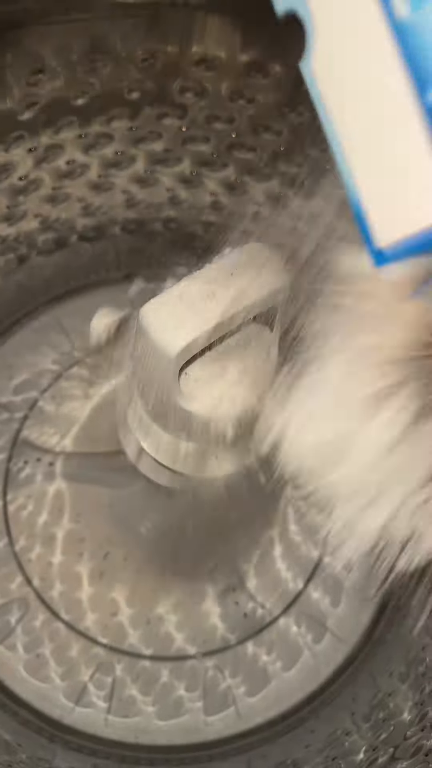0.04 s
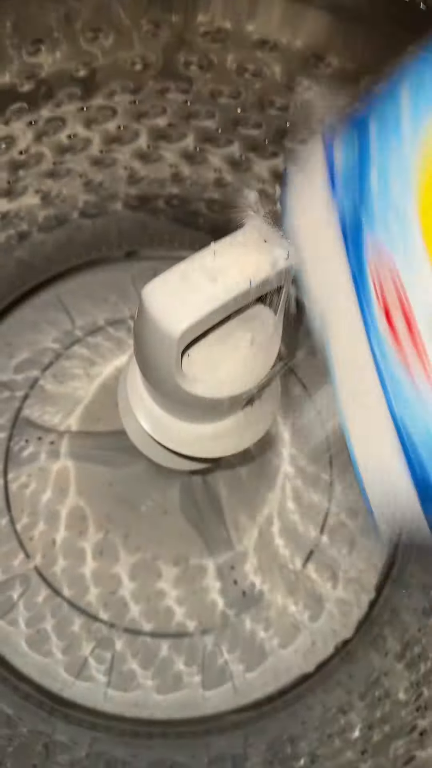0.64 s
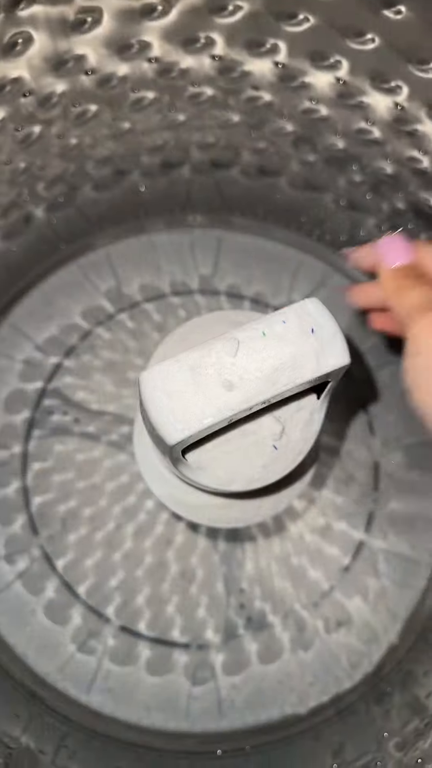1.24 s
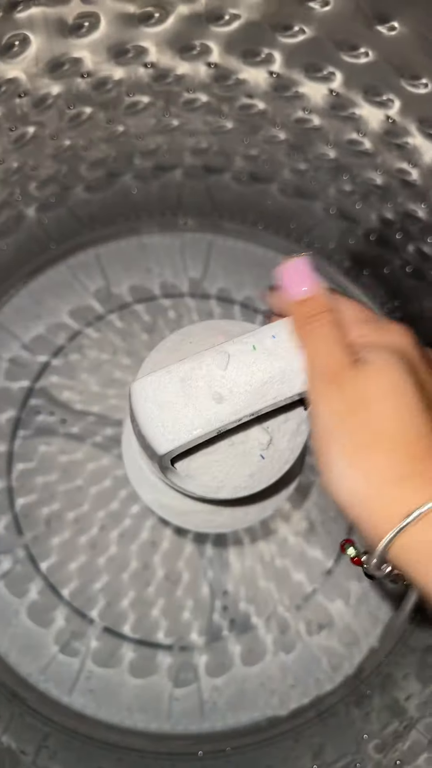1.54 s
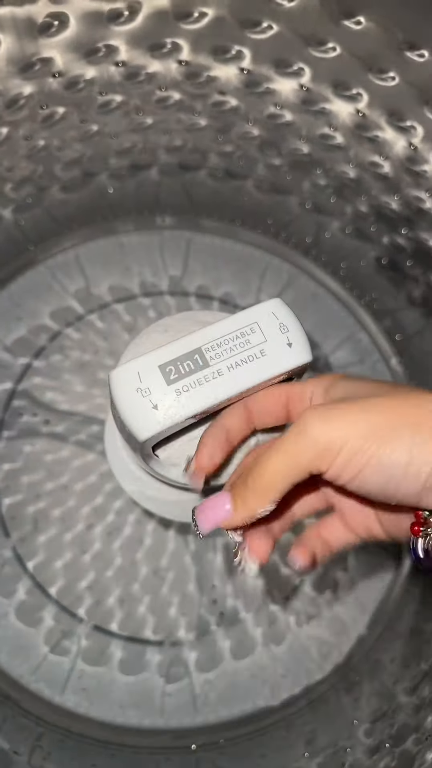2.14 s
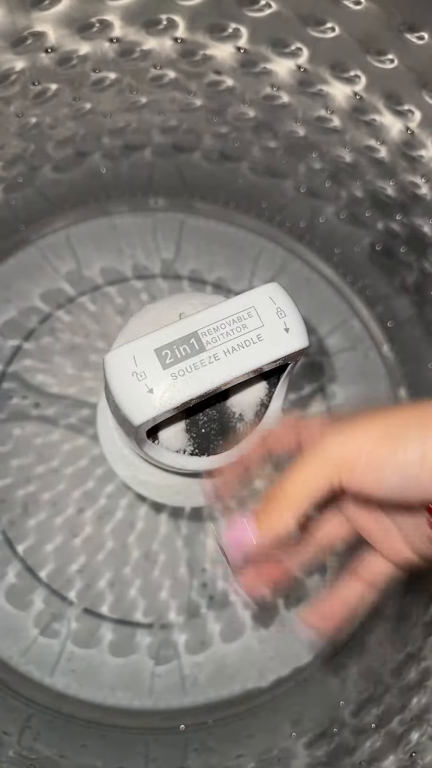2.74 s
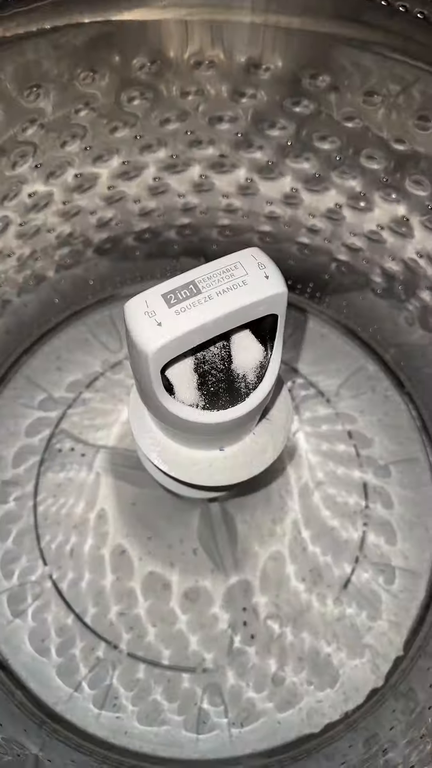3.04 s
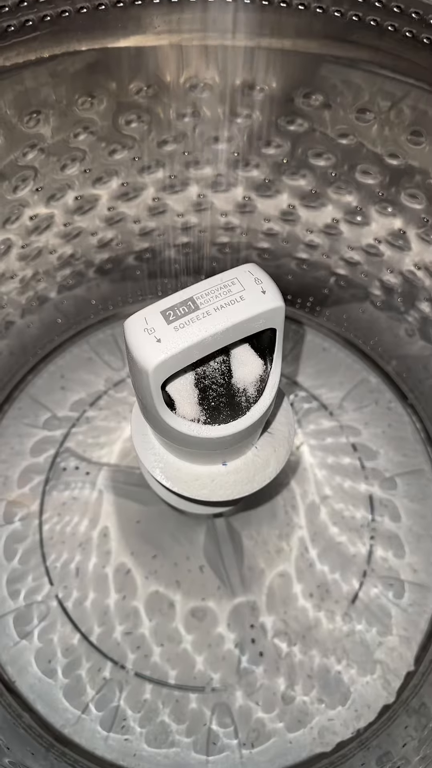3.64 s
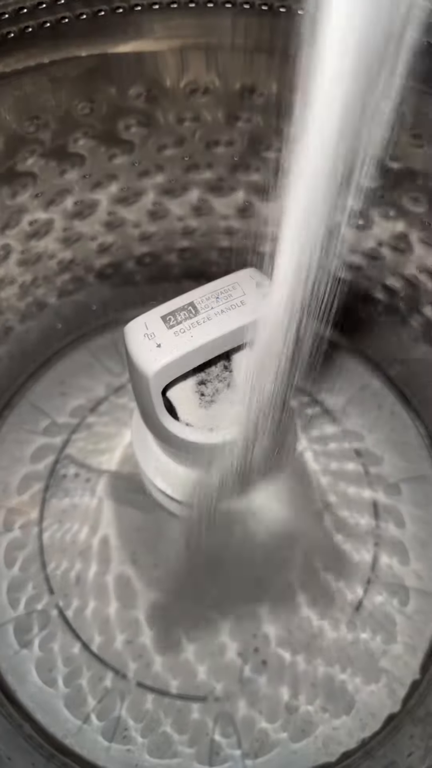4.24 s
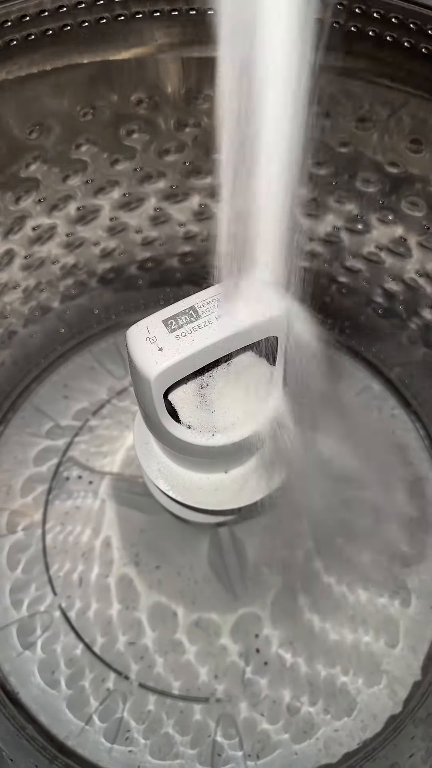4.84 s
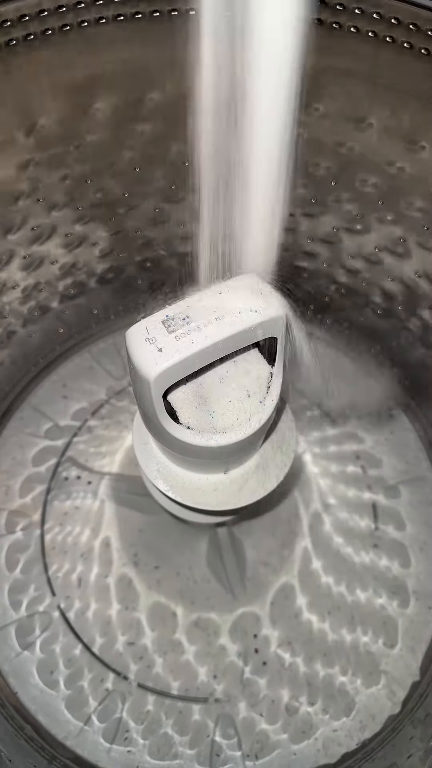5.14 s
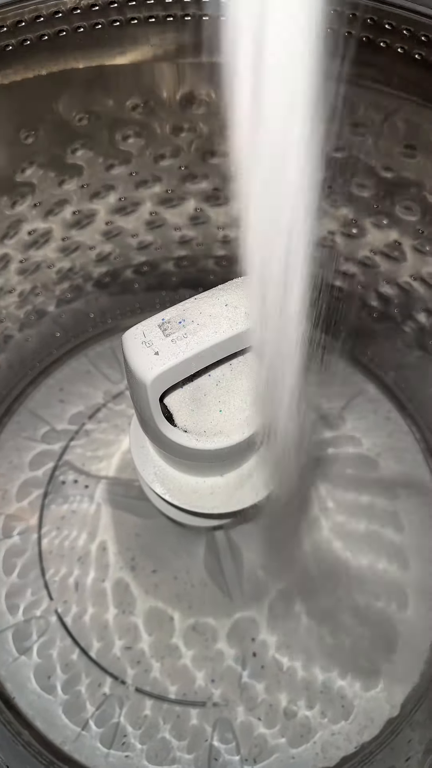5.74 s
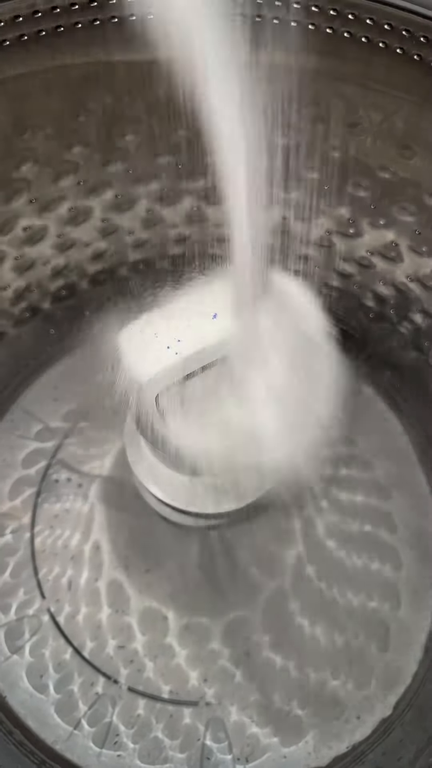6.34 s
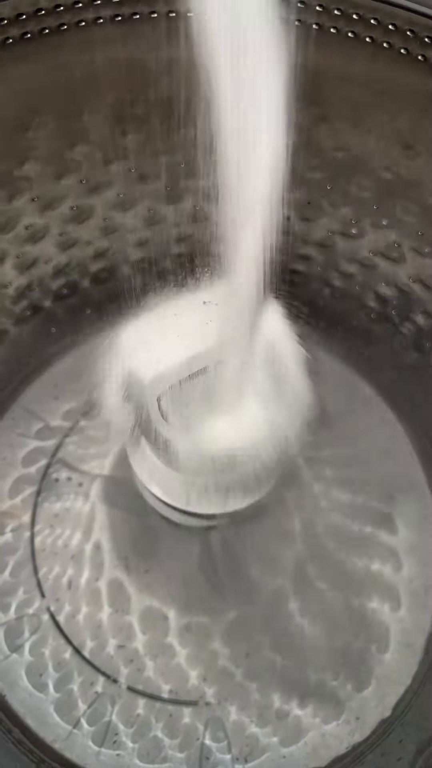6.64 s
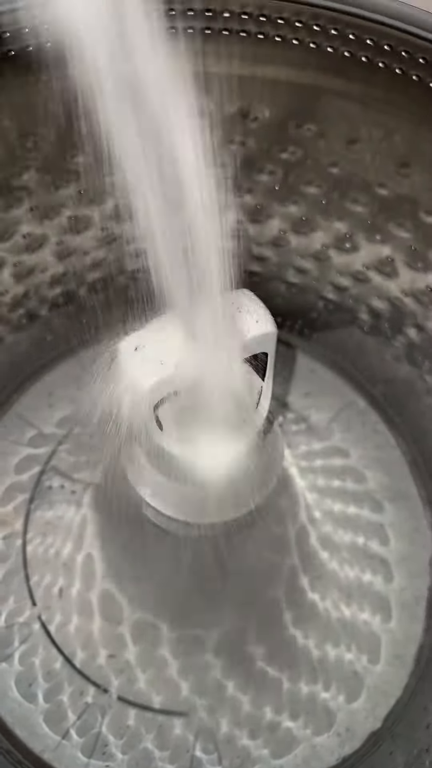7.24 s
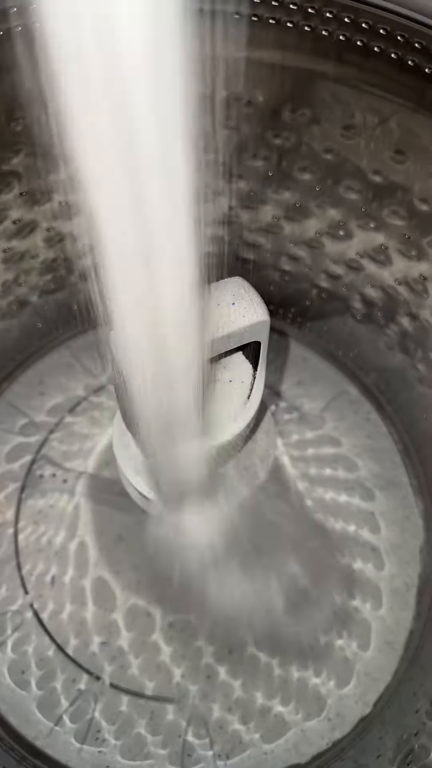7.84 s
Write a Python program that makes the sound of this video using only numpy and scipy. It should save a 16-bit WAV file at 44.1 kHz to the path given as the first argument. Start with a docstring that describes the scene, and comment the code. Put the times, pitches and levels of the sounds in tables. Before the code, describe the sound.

From the start, washing powder spurts and trickles into an empty steel washer drum, close to the microphone. Its cardboard box knocks hollowly, loudest at about 0.2 and 0.6 seconds, with a low shudder from the tub. The sound cuts off briefly at 1.1 seconds. At 1.5 seconds a hand knocks the plastic dispenser, then rubs over it with light bumps and gritty scrapes. A quick cluster of knocks comes around 2.4 seconds, with a sharp snap of the catch and a thin slide of grains. After another short silence at 3 seconds, a stream of powder starts faintly and builds by 4 seconds into a continuous hiss and patter, softer than the knocks. Hard crumbs tick around 4.2 and 5.6 seconds. The stream shifts from steel onto hollow plastic, turning uneven with bursting clumps from 6.3 to 7.4 seconds, and continues until about 8 seconds.

```python
"""A cardboard box knocks and spurts washing powder into the empty steel drum of a top-loading washer,
close to the microphone. A hand pushes, rubs and snaps the plastic dispenser on the agitator; then a
long stream hisses on steel and plastic, with hard crumbs ticking and soft clumps bursting in it.
The powder is thousands of tiny impacts; knocks ring the modes of cardboard and plastic, and the steel
walls reflect them. Two short silences separate the box, the hand and the long pour."""
import sys
import numpy as np
from scipy import signal
from scipy.fft import rfft, irfft, next_fast_len
from scipy.io import wavfile
from scipy.ndimage import uniform_filter1d

SR = 44100
rng = np.random.default_rng(int(sys.argv[2]) if len(sys.argv) > 2 else 0)


def log_audio(samples):
    """Write samples as a 16-bit WAV file to the path given in sys.argv[1]."""
    # one column per channel
    frames = np.atleast_2d(samples).T
    # limit to full scale, then quantise
    limited = np.clip(frames, -1, 1)
    pcm = np.round(limited * 32767).astype(np.int16)
    wavfile.write(sys.argv[1], SR, pcm)


N = 355887
T = np.arange(N) / SR
HIT_T = T[:SR // 2]

# flow of the long stream: (time [s], hiss level [dB])
POUR_FLOW = [(3.17, -68.5), (3.29, -59), (3.43, -55.0), (3.62, -64.5), (3.76, -59), (4.09, -50.5),
             (4.2, -53), (4.36, -49), (4.62, -54), (5.0, -56), (5.2, -51.5), (5.6, -52.5), (5.85, -56.5),
             (6.03, -55), (6.13, -60.3), (6.19, -51), (6.3, -52), (7.2, -49), (7.4, -54), (8.07, -55)]
# where it lands: (time [s], share on the plastic handle [0-1]); the rest hits the drum floor
POUR_AIM = [(3.1, 0.14), (4.1, 0.2), (4.8, 0.14), (5.3, 0.45), (5.7, 0.6), (6.0, 0.76), (8.07, 0.88)]
# powder on the steel floor, and on the handle: (frequency [Hz], gain [dB])
FLOOR_COLOUR = [(120, -0.5), (380, 7.5), (630, 0), (830, 6), (1150, 4), (2000, -4), (2700, -1.5), (3900, 1),
                (5000, -1.5), (6200, -6.5), (8200, -3.5), (10200, -15), (13700, -12), (16000, -12.5)]
HANDLE_COLOUR = [(120, -2.5), (420, 7), (800, 5), (1040, 2), (1225, 5.5), (1950, -11.5), (2700, -4.5),
                 (3200, -10), (4050, -5), (5200, -17.5), (6400, -9), (8400, -5), (11300, -20.5),
                 (14000, -14.5)]
# resonances of the hollow handle: (frequency [Hz], width [Hz], gain [dB])
HANDLE_RINGS = [(1210, 110, -7.5), (2620, 170, -14), (4030, 260, -10.5), (8570, 600, -14.5)]
JIGGLE_START_S, JIGGLE_END_S = 6.28, 7.36


def pour():
    """Close up, the stream wanders from drum floor to handle; jiggling the box drops heavier slugs."""
    flow, uneven_db = curve(POUR_FLOW), choke_and_surge_db()
    jiggled = (T > JIGGLE_START_S) & (T < JIGGLE_END_S)
    patter = flow * undb(np.where(jiggled, 1, -3) + uneven_db / 2)
    hiss = flow * undb(uneven_db)
    floor = powder(patter, hiss, FLOOR_COLOUR, per_s=25000, spread_db=2, flutter_db=1.7, split_hz=2040)
    handle = powder(patter, hiss, HANDLE_COLOUR, per_s=22000, flutter_db=1.28, split_hz=2140)
    for hz, width_hz, db in HANDLE_RINGS:
        handle = handle + undb(db) * resonate(handle, hz, width_hz)
    share = np.interp(T, *np.transpose(POUR_AIM))
    return np.sqrt(1 - share) * floor + np.sqrt(share) * undb(-.5) * handle


def choke_and_surge_db(choke_db=-7, surge_db=1.5):
    """A jiggled clump holds the stream back just before it lands, and the stream surges behind it."""
    change_db = np.zeros(N)
    for s, _, _, firmness in CLUMPS:
        if JIGGLE_START_S < s < JIGGLE_END_S:
            choke = choke_db * bump(s - .022, width_s=.039)
            surge = surge_db * bump(s + .04, width_s=.02)
            change_db += firmness * (choke + surge)
    return change_db


def powder(patter, hiss, spectrum, per_s, flutter_db, split_hz, spread_db=0):
    """Grains land in the drum: the mass patters low, single grains hiss high, and the flow flutters."""
    impacts = grains(per_s, spread_db) * undb(flutter_db * walk(per_s=70))
    sound = colour(drum(impacts, wet_db=-8.5, t60=.11), spectrum)
    low = cut(sound, split_hz, "low", order=4)
    high = cut(sound, split_hz, "high", order=4)
    return patter * unit(low) + hiss * unit(high)


# trickle from the shaken box: (time [s], hiss level [dB])
SHAKE_FLOW = [(0, -43), (0.09, -50.5), (0.15, -51.5), (0.26, -49.5), (0.33, -55), (0.43, -61), (0.6, -48.5),
              (0.8, -58), (0.9, -60), (1.07, -57.5)]
# spurts in the trickle: (peak time [s], level [dB], fade [s])
SPURTS = [(.05, -64.5, 0.049), (.125, -61.5, .012), (.385, -47, 0.0068), (.48, -51, 0.013),
          (.68, -54.5, 0.01), (.76, -55.5, 0.1), (.85, -50, 0.012)]
# shaken powder landing: (frequency [Hz], gain [dB])
SHAKE_COLOUR = [(100, 0), (200, 6), (450, 3), (850, 5.5), (1100, -6.5), (1900, -12.5), (3300, -3.5),
                (4400, -13.5), (7500, -5), (9000, -9), (10500, -22.5), (14000, -20.5)]


def shake(jar_db=-31, jar_rise_s=.0067, jar_fade_s=.035):
    """A dwindling trickle spurts into the drum; every knock of the box jars more powder loose."""
    flow = np.hypot(curve(SHAKE_FLOW), swells(SPURTS, rise_s=.033))
    jolts = [(s + jar_rise_s, db + jar_db, jar_fade_s) for s, db, _, _ in BOX_KNOCKS]
    patter = undb(3.5) * flow + swells(jolts, jar_rise_s)
    return powder(patter, flow, SHAKE_COLOUR, per_s=12000, flutter_db=2, split_hz=1980)


# clumps landing: (peak time [s], level [dB], fade [s], firmness [0-1])
CLUMPS = [(.077, -34.5, 0.0056, 0.3), (.933, -34.5, .025, 0.1), (.957, -36, .013, 0.08),
          (3.887, -51, 0.022, 0.5), (4.24, -43.5, 0.012, 0.1), (4.307, -38, 0.031, 0.2),
          (4.424, -47, 0.079, 0), (4.522, -45, .015, 0), (4.655, -49.5, 0.015, 0.1),
          (4.71, -48, 0.011, 0.1), (5.113, -49, 0.031, .3), (5.652, -46.5, 0.032, 0.6),
          (5.875, -40, 0.0053, 0.95), (6.308, -44.5, 0.012, 1), (6.451, -39, 0.0094, 0.53),
          (6.513, -47, 0.032, 0), (6.60, -39, 0.011, 1), (6.75, -38.5, 0.02, 0.7),
          (6.806, -36.5, 0.022, 0.55), (6.888, -39, 0.031, 0.7), (6.944, -42, 0.054, 0.8),
          (7.031, -35.5, 0.021, 0.96), (7.092, -39.5, 0.02, 0.94), (7.141, -43.5, 0.054, 0),
          (7.183, -34, 0.02, 0.4), (7.248, -42, 0.034, 0.3), (7.309, -34, 0.019, 0.95),
          (7.721, -37.5, 0.011, 0.86)]
# a bursting clump: (frequency [Hz], gain [dB])
CLUMP_COLOUR = [(100, 3), (290, -2), (420, 6.5), (950, -0.5), (1250, 5), (2000, -11), (4000, -9),
                (5700, -17), (7600, -8), (11500, -26.5), (14500, -24)]


def clumps():
    """Clumps burst into showers of grains, firm ones more suddenly."""
    rise_s = np.interp([firmness for *_, firmness in CLUMPS], [0, 1], [.016, .0024])
    return bursts([row[:3] for row in CLUMPS], rise_s, CLUMP_COLOUR, per_s=6000, spread_db=1.5)


def chips(mean_gap_s=.0077, corner_hz=9500):
    """Each clump throws two crumbs, as it lands and a moment later; the firmer, the louder."""
    rows = []
    for s, _, _, firmness in CLUMPS:
        gap_s = mean_gap_s * (.5 + rng.random())
        db = -32 - 17.5 * (1 - firmness)
        rows += [(s, db, corner_hz), (s + gap_s, db - 3, corner_hz)]
    return rows


# hard crumbs landing: (time [s], peak level [dB], low-pass corner [Hz])
CRUMBS = [(.229, -41, 11900), (.457, -42, 9000), (.516, -35, 9100), (.682, -32, 9000), (2.201, -40, 12100),
          (3.622, -31, 2740), (3.953, -29.5, 4230), (4.2008, -25, 4900), (4.208, -20.5, 13000),
          (4.2846, -19.5, 13700), (4.2869, -29, 3120), (4.4027, -29, 13100), (4.414, -30, 1970),
          (5.510, -26, 7040), (5.6335, -30, 14900), (5.653, -35, 12900)]


def crumbs():
    """A hard crumb ticks in the drum and breaks in a duller spray; the surface under it thuds."""
    out = np.zeros(N)
    for s, db, corner_hz in CRUMBS + chips():
        tick, spray, panel = rng.standard_normal((3, len(HIT_T)))
        shatter = undb(-10) * unit(cut(spray, 4000, "low")) * fade(t60=.012)
        hit = tick * fade(t60=.004) + shatter
        hit = cut(cut(hit, corner_hz, "low", order=3), 900, "high")
        thud = panel * fade(t60=.032)
        thud = cut(cut(thud, 1500, "low", order=4), 310, "high")
        add(out, s, undb(db) * peak(peak(hit) + undb(-11) * peak(thud)))
    return drum(out, wet_db=-13, t60=.14)


# knocks of the box: (time [s], level [dB], contact pitch [Hz], hardness [0-1])
BOX_KNOCKS = [(.001, -29.5, 220, 0), (.028, -24, 457, 0.64), (.168, -8.5, 411, 0.23), (.172, -12, 700, 1),
              (.204, -26.5, 438, 0.08), (.25, -35, 456, .1), (.284, -36, 840, 0.7), (.358, -34, 537, 0.05),
              (0.5624, -8.5, 633, 0.77), (.624, -22.5, 645, .1), (.635, -8.5, 291.6, 0.98),
              (.655, -23, 198, 0.4), (.841, -43, 750, .7), (1.056, -34, 424, .9)]
# cardboard panels and the air inside: (frequency [Hz], gain [dB], t60 before damping [s])
BOX_MODES = [(130.3, -19.5, 0.12), (191, -22, .09), (209.3, -1, 0.34), (218, -5, 0.29), (284, -20.5, 0.057),
             (373, 4, 0.092), (443, -11, 0.29), (570, -3, 0.058), (674, -21, .25), (716, 13.5, 0.0048),
             (800, -24.5, .06), (882, 0.5, 0.13), (1330, -14.5, .02)]
# crack of first touch on cardboard: (frequency [Hz], gain [dB])
BOX_CRACK = [(700, 2), (1500, -1), (1950, -3), (2500, -2), (3600, -0.5), (4300, -16), (8000, -12),
             (10500, -30.5), (16000, -31)]


def box():
    """The hollow cardboard box knocks about in the drum, close to the microphone."""
    hits = knocks(BOX_KNOCKS, BOX_MODES, BOX_CRACK, push_s=.00216,
                  crack_t60=.023, crack_rise_s=.0017, drag_db=-30, drag_t60=.09)
    return drum(hits, wet_db=-18.5, t60=.3)


# knocks on the dispenser: (time [s], level [dB], contact pitch [Hz], hardness [0-1])
HAND_KNOCKS = [(1.533, -15.5, 384, 0.64), (1.735, -34, 390, 0), (1.788, -28.5, 277, 0),
               (1.816, -23, 357, 0.3), (1.841, -28.5, 224, 0.2), (1.863, -28, 249, 0.44),
               (2.087, -37.5, 357, 0.18), (2.225, -39.5, 412, 0), (2.243, -35, 286, 0.44),
               (2.320, -23.5, 338, 0.46), (2.344, -23.5, 330, 0), (2.384, -17.5, 377, 0.8),
               (2.395, -21, 360, 0.94), (2.404, -15.5, 307, 0.64), (2.449, -21.5, 330, 0.3),
               (2.477, -26, 290, 0), (2.497, -26, 259, 0.16), (2.512, -22.5, 330, 0),
               (2.544, -29.5, 246, 0.44), (2.702, -36, 350, .1), (2.725, -37.5, 283, 0.4),
               (2.749, -39.5, 218, 0.7), (2.772, -37.5, 202, 0.9)]
# plastic agitator: (frequency [Hz], gain [dB], t60 before damping [s])
AGITATOR_MODES = [(131, -21, 0.45), (181.7, 0, 0.3), (219.4, 8, 0.094), (280, -36, 0.072),
                  (331.5, -7, 0.11), (391, -12, 0.076), (410.4, -0.5, 0.11), (446, -0.5, 0.12),
                  (550, -6, 0.057), (593, -20, .04), (730, -11, .04), (875, -16, 0.036), (1480, -23, .06),
                  (1700, -19, 0.05)]
# crack of first touch on plastic: (frequency [Hz], gain [dB])
HAND_CRACK = [(600, 23.5), (1000, -1.5), (1450, -2.5), (1800, -2), (2200, 3.5), (3000, -9.5), (4500, -55),
              (9000, -32), (16000, -33)]


def hand():
    """At close range, a hand knocks the dispenser and rings the agitator under it."""
    return knocks(HAND_KNOCKS, AGITATOR_MODES, HAND_CRACK, push_s=.00258,
                  crack_t60=.066, crack_rise_s=.0015, drag_db=-10.5, drag_t60=.082)


def knocks(rows, modes, crack_colour, push_s, crack_t60, crack_rise_s, drag_db, drag_t60):
    """The first touch cracks; a push swells and rings the modes near its pitch, then drags on."""
    out = np.zeros(N)
    swell = HIT_T / push_s - 2  # zero at the height of the push
    for s, db, hz, hardness in rows:
        grit, judder = rng.standard_normal((2, len(HIT_T)))
        # hard knocks ring less and crack more
        damping = np.interp(hardness, [0, 1], [.79, 3.5])
        crack_db = np.interp(hardness, [0, 1], [-21, -3])
        push = np.exp(-swell ** 2) * np.sin(2 * np.pi * hz * push_s * swell)
        drag = unit(cut(judder, 2 * hz, "low")) * np.clip(swell, 0, 1) * fade(drag_t60)
        body = signal.fftconvolve(push + undb(drag_db) * drag, ring(modes, damping))[:len(HIT_T)]
        crack = colour(grit, crack_colour) / 2 * fade(crack_t60) * np.minimum(HIT_T / crack_rise_s, 1)
        add(out, s, undb(db) * (peak(body) + undb(crack_db) * crack))
    return out


# snaps of the latch: (time [s], peak level [dB])
SNAPS = [(2.157, -43), (2.169, -46), (2.448, -23), (2.4499, -34), (2.454, -24.5), (2.520, -38),
         (2.543, -43)]
# plastic latch: (frequency [Hz], gain [dB], t60 [s])
LATCH_MODES = [(1736, 19, 0.046), (1890, -17, .03), (3580, -9, 0.036), (4150, -19, .03), (4340, -2, .025),
               (5270, -20, 0.021), (5370, -17, 0.0089), (8250, -20, .02), (8700, -3, .025)]


def latch():
    """The dispenser's stiff plastic catch clicks and rings."""
    out, ringing = np.zeros(N), peak(ring(LATCH_MODES))
    for s, db in SNAPS:
        click = cut(rng.standard_normal(len(HIT_T)), 4200, "low") * fade(t60=.026)
        add(out, s, undb(db) * peak(ringing + undb(1) * peak(click)))
    return out


# shudders of the tub: (peak time [s], level [dB], fade [s])
SHUDDERS = [(.186, -22.5, 0.021), (.665, -31, 0.039), (.738, -43.5, 0.039), (1.84, -36.5, .03),
            (2.272, -45, 0.044), (2.42, -35, .036), (2.56, -39, 0.045), (2.736, -36.5, 0.033)]
# their rumble: (frequency [Hz], gain [dB])
SHUDDER_COLOUR = [(25, -25), (50, -13), (75, 1.5), (105, -10.5), (160, -8.5), (260, -25.5), (500, -31),
                  (2000, -74)]


def shudders():
    """Below the knocks, the tub shudders on its springs."""
    return bursts(SHUDDERS, rise_s=.049, spectrum=SHUDDER_COLOUR, per_s=5600, spread_db=2)


# scrapes of plastic: (peak time [s], level [dB], fade [s])
SCRAPES = [(1.355, -57, .01), (1.80, -42, 0.017), (1.835, -37.5, 0.024), (2.093, -49.5, 0.018),
           (2.162, -57, 0.011), (2.35, -39.5, 0.013), (2.394, -32, .021), (2.48, -48, 0.14),
           (2.52, -35, 0.029), (2.735, -41, 0.03), (2.9, -68, 0.14), (3.103, -59.5, 0.016)]
# their rasp: (frequency [Hz], gain [dB])
SCRAPE_COLOUR = [(150, 2.5), (500, 9), (1000, -8), (1400, -3.5), (1780, -1), (2300, -15.5), (3000, -17.5),
                 (4500, -28), (9000, -38), (16000, -61)]


def scrapes():
    """Gritty plastic scrapes in short, dull rasps."""
    return bursts(SCRAPES, rise_s=.014, spectrum=SCRAPE_COLOUR, per_s=9100)


# slides of loose powder: (peak time [s], level [dB], fade [s])
SLIDES = [(2.011, -57.5, 0.031), (2.158, -54, 0.01), (2.27, -61, 0.21), (2.347, -51, 0.0046),
          (2.451, -34.5, .01), (2.592, -42.5, .043), (2.753, -51.5, .013), (2.889, -51.5, 0.027)]
# their hiss: (frequency [Hz], gain [dB])
SLIDE_COLOUR = [(500, -47), (1400, -3), (2000, 3), (3000, -2), (3900, -8.5), (5200, -3), (6800, -7.5),
                (8500, -5.5), (10500, -19.5), (14000, -17.5), (16000, -23)]


def slides():
    """Inside the dispenser, loose grains slide with a thin hiss."""
    return bursts(SLIDES, rise_s=.021, spectrum=SLIDE_COLOUR, per_s=33000, spread_db=.7)


# fingers sliding over the handle: (time [s], relative level [dB])
RUB_STROKE = [(1.54, -64), (1.638, -52.5), (1.662, -46.5), (1.706, -57.5), (1.77, -48), (1.812, -69),
              (1.842, -61), (1.934, -74.5), (2.0, -75)]
# skin on plastic: (frequency [Hz], gain [dB])
RUB_COLOUR = [(160, 4), (450, 4), (850, -12), (1200, -8), (1550, 0.5), (2300, -11.5), (2850, -0.5),
              (3600, -10), (5200, -2), (7000, -9.5), (9000, -9.5), (11000, -23), (16000, -22)]


def rub():
    """Skin drags over dusty plastic near the microphone: a fine rasp, and the hollow handle hums."""
    slips = grains(per_s=18000)
    hum = resonate(slips, hz=368, width_hz=15)
    hum = undb(3.5) * unit(cut(hum, 670, "low", order=4))
    return undb(3.5) * curve(RUB_STROKE) * (colour(slips, RUB_COLOUR) + hum)


def drum(x, wet_db, t60):
    """Dense reflections between the steel walls, the first reaching the microphone after 2 ms."""
    echoes = rng.standard_normal(len(HIT_T)) * fade(t60) * (HIT_T > .002)
    return x + undb(wet_db) * signal.fftconvolve(x, echoes / np.linalg.norm(echoes))[:N]


# room tone: (frequency [Hz], gain [dB])
ROOM_TONE = [(20, 2.5), (65, 5.5), (120, -3), (350, -6.5), (700, -15.5), (1500, -24.5), (4000, -31),
             (8500, -29), (11000, -41.5), (16000, -38)]


def room():
    """Faint, low, steady noise from the room around the washer."""
    return undb(-59.5) * colour(rng.standard_normal(N), ROOM_TONE)


def grains(per_s, spread_db=0):
    """Random tiny impacts; spread_db makes a few of them much larger."""
    sizes = undb(spread_db * np.minimum(rng.exponential(size=N), 6))
    lands = rng.random(N) < per_s / SR
    return unit(lands * rng.standard_normal(N) * sizes)


def bursts(rows, rise_s, spectrum, per_s, spread_db=0):
    """Short showers of impacts that swell and die away."""
    return colour(grains(per_s, spread_db), spectrum) * swells(rows, rise_s)


def swells(rows, rise_s):
    """Envelope peaking at each (time [s], level [dB], fade [s]); one rise time for all or one each."""
    envelope = np.zeros(N)
    for (s, db, fade_s), rise in zip(rows, np.broadcast_to(rise_s, len(rows))):
        attack = np.minimum(HIT_T / rise, 1) ** 2
        decay = np.exp(-np.maximum(HIT_T - rise, 0) / fade_s)
        add(envelope, s - rise, undb(db) * attack * decay)
    return envelope


def curve(rows):
    """Gain through (time [s], level [dB]) points, silent outside their span."""
    return undb(np.interp(T, *np.transpose(rows), left=-200, right=-200))


def bump(s, width_s):
    """Bell curve centred on time s."""
    return np.exp(-((T - s) / width_s) ** 2)


def walk(per_s):
    """Random wander with a spread of about 1."""
    knots = rng.standard_normal(N // 20)
    return 1.2 * np.interp(T * per_s, np.arange(len(knots)), knots)


def ring(modes, damping=1):
    """Impulse response of a set of modes."""
    return sum(undb(db) * np.sin(2 * np.pi * hz * HIT_T) * fade(t60 / damping) for hz, db, t60 in modes)


def fade(t60):
    """Exponential decay, 60 dB down after t60 seconds."""
    return np.exp(-np.log(1000) * HIT_T / t60)


def resonate(x, hz, width_hz):
    """Pass x through one resonance."""
    return signal.lfilter(*signal.iirpeak(hz, hz / width_hz, fs=SR), x)


def colour(x, points):
    """Shape by (frequency [Hz], gain [dB]) points, rolling off below the first; rms 1."""
    hz, db = np.transpose(points)
    size = next_fast_len(len(x))
    freq = np.maximum(np.fft.rfftfreq(size, 1 / SR), 1)
    gain = undb(np.interp(np.log(freq), np.log(hz), db)) * np.minimum(freq / hz[0], 1) ** 2
    return unit(irfft(rfft(x, size) * gain, size)[:len(x)])


def cut(x, hz, kind, order=2):
    """Butterworth low-pass or high-pass."""
    return signal.sosfilt(signal.butter(order, min(hz, .45 * SR), kind, fs=SR, output="sos"), x)


def add(out, s, x):
    """Mix x into out at time s."""
    start = max(int(s * SR), 0)
    out[start:start + len(x)] += x[:N - start]


def undb(db):
    return 10 ** (np.asarray(db) / 20)


def unit(x):
    """Scale to rms 1."""
    return x / np.sqrt(np.mean(x ** 2))


def peak(x):
    """Scale to peak 1."""
    return x / np.abs(x).max()


def scene():
    """One microphone close to the drum: powder, box and hand over a quiet room."""
    handling = slides() + scrapes() + shudders() + box()
    dispenser = drum(hand() + latch(), wet_db=-6.5, t60=.095)
    return (handling + dispenser + crumbs() + room() + shake() + pour() + clumps() + rub())[None]


# stretches when the microphone is open: (start [s], end [s])
OPEN_SPANS = [(-.1, 1.087), (1.155, 3.001), (3.08, 8.2)]


def record(dry, fade_in_s=.02, top_hz=15800):
    """Each stretch fades in quickly and stops dead, 45 dB down in the gaps; the top treble is cut."""
    gate = sum(np.clip((T - start) / fade_in_s, 0, 1) * (T < end) for start, end in OPEN_SPANS)
    gate = np.maximum(uniform_filter1d(gate, size=64), undb(-45))
    return signal.sosfilt(signal.ellip(10, .2, 70, top_hz, fs=SR, output="sos"), dry * gate)


dry = scene()
out = record(dry)
log_audio(out)
```